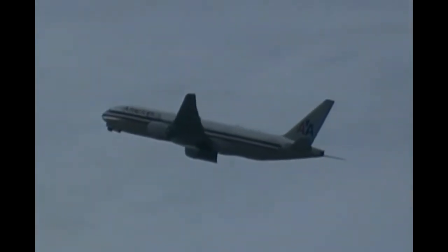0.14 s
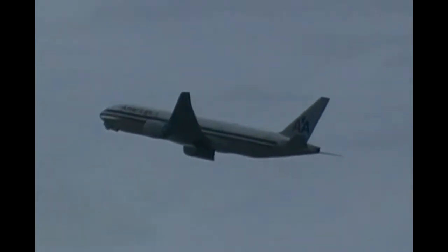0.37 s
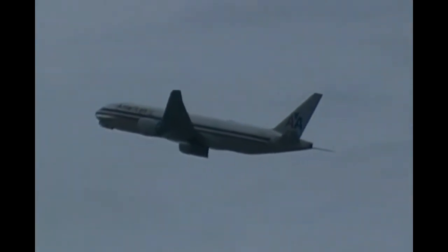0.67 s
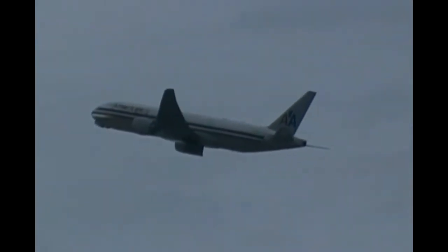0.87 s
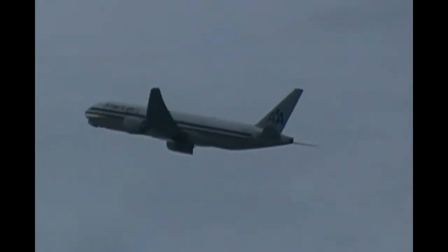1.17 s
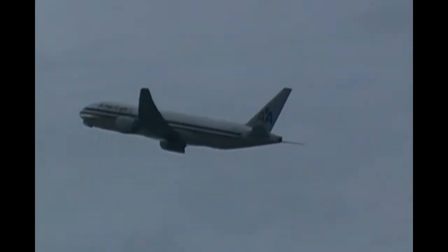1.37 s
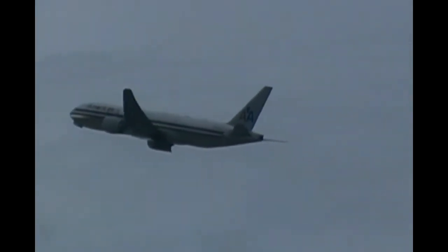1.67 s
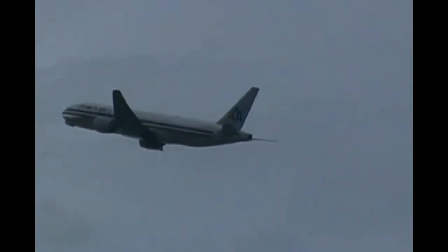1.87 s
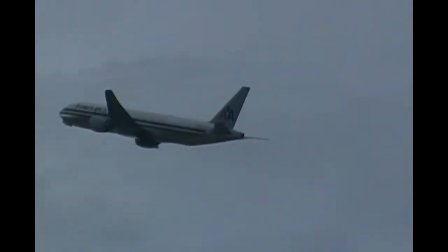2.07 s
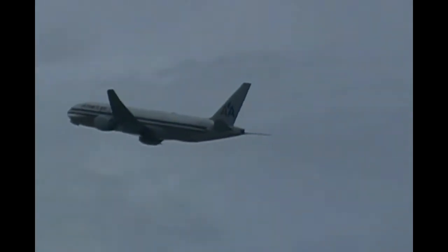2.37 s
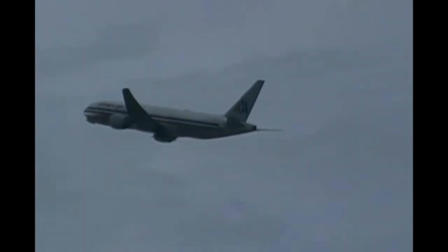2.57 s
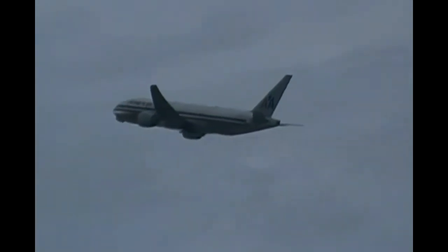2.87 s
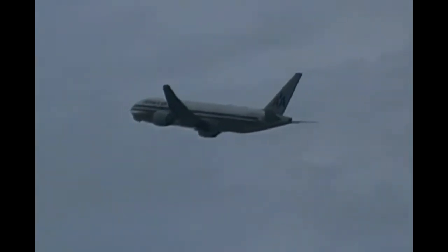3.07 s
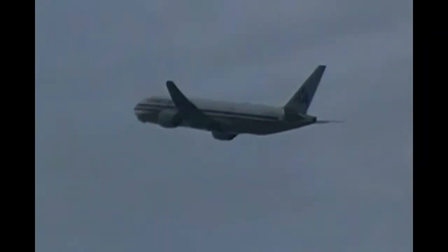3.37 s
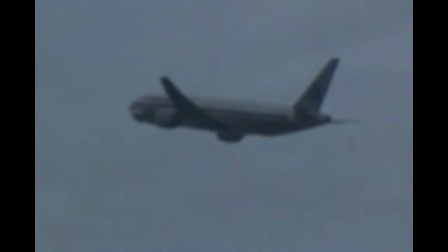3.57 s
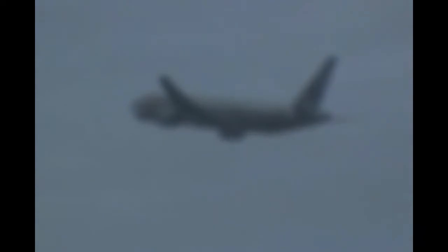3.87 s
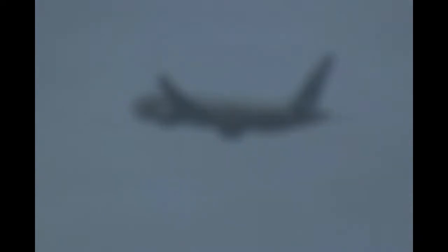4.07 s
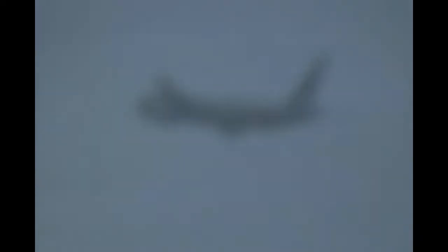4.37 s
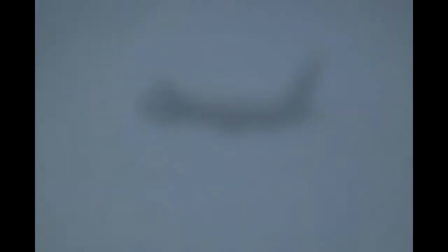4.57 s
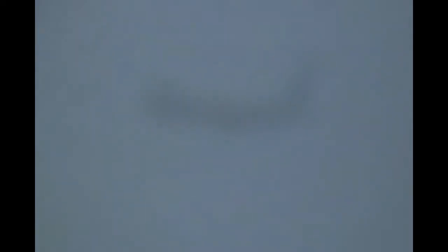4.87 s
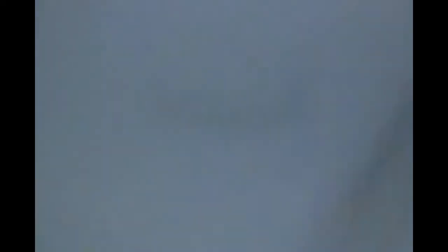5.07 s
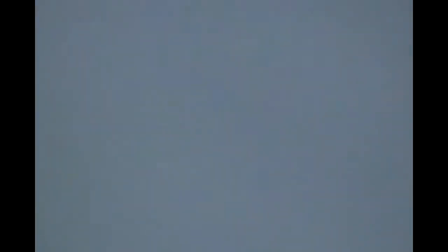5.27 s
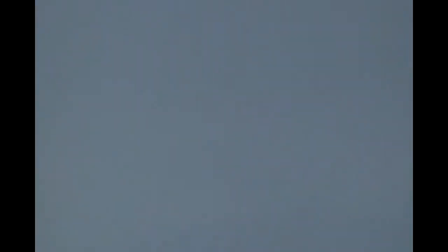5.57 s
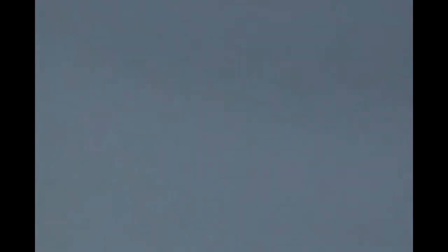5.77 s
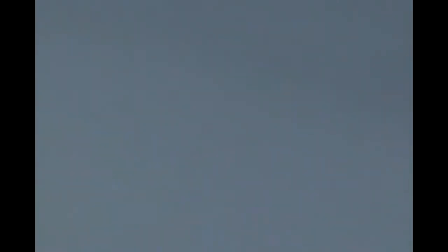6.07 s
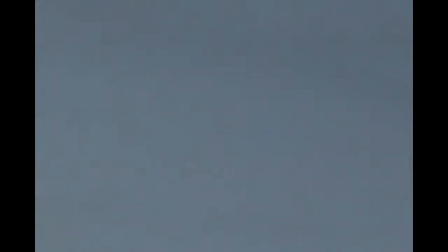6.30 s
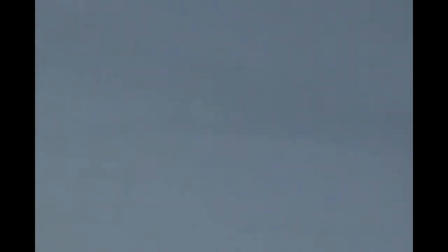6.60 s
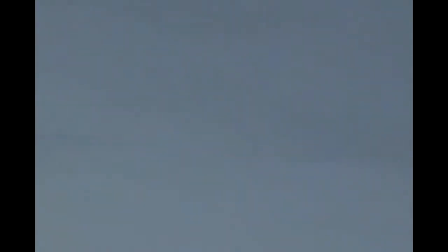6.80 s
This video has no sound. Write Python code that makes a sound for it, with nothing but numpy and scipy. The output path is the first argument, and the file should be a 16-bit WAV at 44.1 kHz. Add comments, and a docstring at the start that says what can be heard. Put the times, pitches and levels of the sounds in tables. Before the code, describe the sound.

A twin-engined airliner climbs away with a rumbling, crackling roar that sinks and returns brighter, while wind gusts buffet the microphone.

```python
"""A twin-engined airliner climbs away from a hand-held camera, its turbulent exhaust rumbling and
crackling under blurred fan tones. Gusts buffet the microphone, the case is scuffed and ticks, and the
level dips now and then. Near 3 s the roar sinks and the lens motor chirrs. From 4.5 s the aircraft has
turned and the roar returns brighter, with a wavering whine near 1 kHz; a small bird calls far off,
and after the sharpest tick the motor chirrs again."""
import sys
import numpy as np
from scipy import signal
from scipy.fft import rfft, irfft, next_fast_len
from scipy.io import wavfile
from scipy.ndimage import map_coordinates

SR = 44100
rng = np.random.default_rng(int(sys.argv[2]) if len(sys.argv) > 2 else 0)


def put_to_file(sound):
    """Save the sound as 16-bit audio at rate SR, in the file named by the first command-line argument."""
    columns = np.atleast_2d(sound).T  # one column per channel
    safe = np.clip(columns, -1, 1)
    whole_steps = np.round(safe * 32767)
    wavfile.write(sys.argv[1], SR, whole_steps.astype(np.int16))


N = 306054


def amp(db):
    """Amplitude ratio of a level in decibels."""
    return 10 ** (np.asarray(db) / 20)


def unit(x):
    """Normalisation to rms 1."""
    return x / np.sqrt(np.mean(x ** 2) + 1e-20)


def along(points, hz):
    """Interpolation of (frequency [Hz], value) points on a logarithmic axis."""
    f, v = np.transpose(points)
    return np.interp(np.log(hz + 1), np.log(f + 1), v)


def clock():
    """The time of every sample [s]."""
    return np.arange(N) / SR


def curves(rows):
    """Linear interpolation in time: one curve for each column after the first."""
    times, *columns = np.transpose(rows)
    return [np.interp(clock(), times, column) for column in columns]


def wobble(rate):
    """Smooth random modulation with `rate` knots a second."""
    return map_coordinates(rng.standard_normal(int(N * rate / SR) + 4), [clock() * rate])


def filtered(x, response):
    """Linear filtering: the spectrum of x times a frequency response."""
    size = next_fast_len(N + SR // 4)
    return irfft(rfft(x, size) * response(np.fft.rfftfreq(size, 1 / SR)), size)[..., :N]


def tone(hz):
    """A sinusoid of rms 1 whose phase is the integral of its frequency."""
    return np.sqrt(2) * np.sin(2 * np.pi * (np.cumsum(hz) / SR + rng.random()))


def rush(spectrum, coherence, shocks_per_s=0, shock_share=0):
    """Partly coherent stereo noise of rms 1; one-sided shocks carry a share of the mid power."""
    def mid_side(hz):
        angle = np.arccos(np.clip(along(coherence, hz), -1, 1)) / 2
        return amp(along(spectrum, hz)) * [np.cos(angle), np.sin(angle)]

    pair = rng.standard_normal((2, N))
    shocks = (rng.random(N) < shocks_per_s / SR) * rng.rayleigh(size=N)
    pair[0] = np.sqrt(1 - shock_share) * pair[0] + np.sqrt(shock_share) * unit(shocks)
    mid, side = filtered(pair, mid_side)
    return unit(np.array([mid + side, mid - side]))


# Strength of the exhaust: (time [s], rumble level [dB], rasp level [dB], hiss level [dB])
ROAR_LEVELS = [(0, -22.5, -32, -46), (.15, -24, -27.5, -49.5), (.23, -22.5, -28, -48.5),
               (.3, -21, -24.5, -45.5), (.38, -22.5, -29.5, -49), (.58, -27.5, -32, -52.5),
               (.72, -28, -32.5, -50.5), (.82, -23.5, -29.5, -50.5), (.95, -25, -31.5, -55),
               (1.09, -21.5, -28, -51.5), (1.2, -22.5, -31.5, -53), (1.33, -20, -31, -53),
               (1.4, -21.5, -32, -54.5), (1.48, -19.5, -28, -57), (1.6, -24, -27.5, -50.5),
               (1.71, -20.5, -25, -53), (1.81, -24.5, -30.5, -54.5), (1.96, -22, -28, -48.5),
               (2.1, -27.5, -33, -56), (2.3, -21.5, -30.5, -54), (2.45, -23.5, -30, -51.5),
               (2.67, -17.5, -26.5, -53.5), (2.76, -22.5, -31.5, -57.5), (2.82, -21, -27.5, -54),
               (2.87, -24, -31.5, -54), (2.95, -27, -37, -57.5), (3.28, -31.5, -38.5, -55.5),
               (3.56, -32.5, -37.5, -60.5), (3.73, -30, -35.5, -59.5), (4.02, -34, -41.5, -60),
               (4.17, -30, -36, -56), (4.23, -38, -38.5, -55), (4.29, -34.5, -33.5, -53.5),
               (4.36, -38, -39.5, -56), (4.52, -37, -36.5, -51.5), (4.63, -33.5, -31.5, -47.5),
               (4.77, -32, -29, -46), (5.0, -27.5, -26.5, -45.5), (5.25, -23, -23, -41.5),
               (5.48, -26.5, -24.5, -42), (5.66, -21.5, -21, -39), (5.86, -27, -26.5, -45.5),
               (6.0, -28, -24, -45.5), (6.3, -24, -22, -43.5), (6.47, -22.5, -22, -40.5),
               (6.56, -23.5, -21, -42.5), (6.64, -25, -22, -43), (6.72, -23.5, -20.5, -44),
               (6.82, -22.5, -21.5, -44.5), (6.94, -23.5, -24, -51)]
# Timbre as the aircraft turns away: (time [s], bright share of the power [0-1])
BRIGHT_SHARE = [(0, 0), (2.9, 0.06), (3.4, 0.15), (4.3, 0.2), (4.8, 1)]
# Spectra of the exhaust's layers: (frequency [Hz], relative level [dB])
RUMBLE_DARK = [(15, -65.5), (25, -26.5), (43, -21), (105, -10.5), (135, -5.5), (155, -7), (180, -3),
               (240, -2), (285, 0.5), (384, -6.5), (420, -3), (495, -3), (606, -13.5), (679, -9),
               (750, -18.5), (980, -42), (1650, -120)]
RUMBLE_BRIGHT = [(15, -56), (25, -19.5), (128, -4.5), (157, -5), (214, -0.5), (251, -1.5), (343, 0.5),
                 (449, -6), (623, -1.5), (750, -9), (980, -17.5), (1650, -120)]
RASP_DARK = [(440, -40.5), (750, -2), (1080, -6), (1210, -5), (2020, -6.5), (2400, -10), (2700, -17.5),
             (3100, -15.5), (3570, -16.5), (3720, -19), (4730, -42.5), (8010, -120)]
RASP_BRIGHT = [(440, -32), (750, -2.5), (902, -9), (997, -1.5), (1360, -7), (1970, -7.5), (2310, -13.5),
               (2530, -13), (3110, -20.5), (3640, -22), (4730, -70.5), (8010, -120)]
HISS_SPECTRUM = [(3000, -31), (3900, -2.5), (5100, -8), (6000, -12), (8000, -19), (9500, -27),
                 (11000, -37.5), (12500, -110)]
# Left-right likeness of each timbre: (frequency [Hz], coherence [0-1])
COHERENCE_DARK = [(1500, 0.99), (3200, .96), (7000, .55)]
COHERENCE_BRIGHT = [(60, 1), (190, 1), (400, 1), (1000, 1), (1800, 0.95), (3200, 0.83), (7000, 0.2)]

def exhaust():
    """Jet mixing noise: large eddies rumble, small ones rasp and hiss; moving air modulates them all."""
    rumble_db, rasp_db, hiss_db = curves(ROAR_LEVELS)
    bright, = curves(BRIGHT_SHARE)
    blend = lambda dark, light: np.sqrt(1 - bright) * dark + np.sqrt(bright) * light
    flutter_db = wobble(42) * (1 - 0.44 * bright)  # calmer in the bright timbre
    rumble = blend(rush(RUMBLE_DARK, COHERENCE_DARK, shocks_per_s=190, shock_share=0.18),
                   rush(RUMBLE_BRIGHT, COHERENCE_BRIGHT))
    rasp = blend(rush(RASP_DARK, COHERENCE_DARK, shocks_per_s=400, shock_share=0.21),
                 rush(RASP_BRIGHT, COHERENCE_BRIGHT))
    hiss = rush(HISS_SPECTRUM, COHERENCE_BRIGHT, shocks_per_s=38, shock_share=0.05)
    roar = (rumble * amp(rumble_db + flutter_db)
            + rasp * amp(rasp_db + flutter_db)
            + hiss * amp(hiss_db + 1.2 * flutter_db))
    swell_db = 0.72 * wobble(16)
    return roar * amp(swell_db)


# Tones of the fan: (frequency [Hz], bandwidth [Hz], level re the rasp [dB])
FAN_BANDS = [(2380, 75, -19.5), (3560, 60, -22.5)]

def fan(end_s=3.5, release_s=.7):
    """Spectral broadening: turbulent air smears the fan's tones, heard until the aircraft turns away."""
    _, rasp_db, _ = curves(ROAR_LEVELS)
    facing = np.clip((end_s - clock()) / release_s, 0, 1)
    bands = np.zeros(N)
    for hz, width_hz, db in FAN_BANDS:
        fading = amp(db + 2 * wobble(6))
        bands += fading * wobble(width_hz) * tone(hz + 20 * wobble(30))
    return facing * amp(rasp_db) * bands


# Gusts on the microphone: (time [s], level [dB], half length [s])
GUSTS = [(0.047, -26, 0.066), (0.157, -24, .035), (0.287, -29, 0.034), (0.501, -25, .045),
         (0.638, -23, 0.074), (0.814, -23.5, .035), (.923, -19, .002), (.93, -24, 0.082), (1.095, -25, .04),
         (1.22, -26.5, 0.057), (1.358, -24.5, .07), (1.566, -26, 0.062), (1.71, -27, 0.044),
         (1.96, -22, 0.063), (2.109, -26, 0.056), (2.248, -21.5, 0.037), (2.73, -23.5, .04),
         (2.829, -25.5, 0.046), (2.925, -25.5, 0.066), (3.054, -25, 0.058), (3.138, -23, .004),
         (3.187, -24.5, 0.017), (3.249, -25, 0.043), (3.353, -21, .008), (3.427, -23, .025),
         (3.518, -26, .04), (3.63, -27, .05), (3.724, -24, 0.06), (3.829, -20.5, .003),
         (3.872, -24.5, 0.043), (3.903, -15, 0.002), (3.99, -31.5, 0.054), (4.175, -31, 0.022),
         (4.36, -36.5, 0.069), (4.753, -39, 0.047), (5.891, -20, .013), (6.048, -21, 0.023),
         (6.13, -24.5, .03), (6.722, -35, .04), (6.916, -32, 0.031)]
# Spectra of the gusts and of the steady breeze: (frequency [Hz], relative level [dB])
GUST_SPECTRUM = [(20, -32), (45, -16.5), (86, -11), (130, -3), (180, 0), (290, 0.5), (480, -2), (600, -5),
                 (800, -11), (1000, -14.5), (2000, -25.5), (3000, -36), (6000, -57), (12000, -120)]
BREEZE_SPECTRUM = [(20, -26), (45, -5), (90, 3.5), (160, 2.5), (400, -17.5), (1200, -60.5), (5000, -120)]

def wind(buffet_db=2.5, buffets_per_s=70, breeze_db=-44.5):
    """Turbulent pressure is local: over a light breeze, gusts buffet each microphone port separately."""
    power = sum(amp(db) ** 2 * np.exp(-((clock() - s) / half_s) ** 2) for s, db, half_s in GUSTS)
    buffets = amp(buffet_db * np.array([wobble(buffets_per_s), wobble(buffets_per_s)]))
    gusts = np.sqrt(power) * unit(buffets * rush(GUST_SPECTRUM, coherence=[(60, 0)]))
    return gusts + amp(breeze_db) * rush(BREEZE_SPECTRUM, coherence=[(60, .1)])


def decay(start_s, t60):
    """Exponential decay from a sudden onset, 60 dB in t60 seconds."""
    return (clock() >= start_s) * amp(-60 * np.abs(clock() - start_s) / t60)


# Spectrum of a scuff on the case: (frequency [Hz], relative level [dB])
SCUFF_SPECTRUM = [(4300, -40), (5200, 0), (6300, -7), (7000, -3), (8000, -6), (8400, -17), (9300, -20),
                  (10000, -70)]

def scuff(start_s=.0767, level_db=-33):
    """Friction noise: a contact too light to ring the case gives a thin snap and a hissing tail."""
    snap = decay(start_s, t60=.03)
    tail = amp(-14) * decay(start_s, t60=.3)
    return amp(level_db) * (snap + tail) * rush(SCUFF_SPECTRUM, coherence=[(6000, 0.57)])


# Ticks of the camera case: (time [s], level [dB], left minus right [dB])
TICKS = [(.709, -29, 0), (2.9395, -32, 0), (2.973, -16.5, -13), (3.310, -36, -5), (4.335, -26.5, 0),
         (4.3725, -24.5, 0), (4.430, -25.5, 0), (4.5012, -23, 0), (4.5445, -17.5, 0), (5.2343, -1.2, 0),
         (5.2366, -8, 0), (5.379, -18, 0), (6.079, -16, 0)]
# Modes of the case: (frequency [Hz], level [dB], decay time T60 [s])
CASE_MODES = [(520, -8, .0061), (1450, -3.5, .005), (2550, 1.5, .0038), (3050, 2.5, .0038),
              (3600, -3, .0034), (4770, -10, .003), (6050, -6.5, .0018), (7500, -9, .0019),
              (10200, -17, .0015)]
# Weak radiation of the highest treble: (frequency [Hz], gain [dB])
CASE_ROLL_OFF = [(11500, -0.5), (13000, -46)]

def case_ticks(chatter_t60=0.011):
    """Modal ringing: a few milliseconds of chatter excite the damped modes of the plastic case."""
    ticks = np.zeros((2, N + SR))
    t = np.arange(SR // 20) / SR
    ring = sum((-1) ** k * amp(db - 60 * t / t60) * np.sin(2 * np.pi * hz * t)
               for k, (hz, db, t60) in enumerate(CASE_MODES))
    for s, db, pan_db in TICKS:
        noise = rng.standard_normal(len(t)) + 0.45 * rng.standard_normal((2, len(t)))
        chatter = noise * amp(-60 * t / chatter_t60)
        tick = signal.fftconvolve(chatter, ring[None], axes=1)[:, :len(t)]
        gains = amp(db + pan_db * np.array([[.5], [-.5]]))
        start = round(s * SR)
        ticks[:, start:start + len(t)] += gains * tick / np.abs(tick).max()
    return filtered(ticks[:, :N], lambda hz: amp(along(CASE_ROLL_OFF, hz)))


# Brief dips of the level: (time [s], depth [dB], hold [s])
DIPS = [(0.713, 4, 0.02), (1.116, 3, 0.027), (1.607, 4, 0.02), (1.979, 4, 0.026), (2.971, 10, 0.1),
        (5.293, 21, 0.0078), (5.866, 8.5, 0.067), (6.035, 10, 0.018), (6.145, 5.5, 0.024)]

def dips(fall_s=0.011, recovery_db_per_s=102):
    """Gain modulation: the level drops fast, holds and climbs back at a steady rate."""
    gain_db = np.zeros(N)
    for s, depth_db, hold_s in DIPS:
        times = np.cumsum([s, fall_s, hold_s, depth_db / recovery_db_per_s])
        gain_db += np.interp(clock(), times, [0, -depth_db, -depth_db, 0])
    return amp(gain_db)


# Runs of the lens motor: (time of peak [s], level [dB], rise time [s])
MOTOR_RUNS = [(2.974, -31, .011), (5.289, -25.5, .056)]
# Harmonics of its steps: (multiple of the step rate [1], relative level [dB])
STEP_HARMONICS = [(1, 2), (2, -3.5), (3, -8), (4, -9), (5, -10.5), (6, -9.5), (7, -11.5), (8, -10), (9, -8),
                  (10, -11), (11, -11)]
# Resonances of its gears: (frequency [Hz], relative level [dB])
GEAR_MODES = [(3900, -7), (5080, -2), (6520, -1), (7920, 0), (9400, -4), (10500, -2), (11800, -4)]

def lens_motor(step_hz=1021, run_s=.018, stop_s=.009, ramp_db=23, sag_db=11):
    """Quasi-periodic forcing: a small motor's uneven steps buzz while its gears rattle and scrape."""
    envelope = np.zeros(N)
    for s, db, rise_s in MOTOR_RUNS:
        t = clock() - s
        ramps = np.maximum(-t / rise_s, 0) + np.maximum((t - run_s) / stop_s, 0)
        envelope += amp(db - ramp_db * ramps - sag_db * np.clip(t / run_s, 0, 1))
    rate_hz = step_hz * (1 + .007 * wobble(300))
    phase = 2 * np.pi * np.cumsum(rate_hz) / SR
    unevenness = amp(4.5 * wobble(400))
    steps = unevenness * sum(amp(db) * np.cos(k * phase) for k, db in STEP_HARMONICS)
    # Each gear resonance is a wavering band about 250 Hz wide.
    gears = sum(amp(db) * wobble(250) * tone(hz + 60 * wobble(300)) for hz, db in GEAR_MODES)
    scrape = rush(spectrum=[(200, -45), (900, 11), (4000, -13), (11500, -19), (13000, -80)],
                  coherence=[(1000, 0.55)])
    chirr = unit(steps) + amp(-7) * unit(gears) + amp(-9) * scrape
    return envelope * chirr * amp([[-3.5], [2.5]])  # nearer the right port


def pin_tick(start_s=3.3095, level_db=-38):
    """A brief contact has a broad spectrum: one faint, pin-sharp tick on the right."""
    burst = decay(start_s, t60=.009) * rng.standard_normal(N)
    return amp(level_db) * burst * amp([[-6], [2]])


# Whine as the engines turn their backs: (time [s], pitch [Hz], level re the rasp [dB])
WHINE_COURSE = [(4.52, 1007, -26), (4.68, 1005, -5.5), (4.8, 1000, -12), (4.89, 1000, -4), (5.2, 1001, -8),
                (5.3, 998, -15), (5.5, 995, -6), (5.66, 992, -10), (5.85, 991, -4), (5.93, 990, -22),
                (6.18, 995, -18), (6.34, 992, -12), (6.56, 987, -10), (6.72, 990, -19), (6.85, 990, -8),
                (6.94, 962, -6)]
# Its partials: (multiple of the pitch [1], level [dB])
WHINE_PARTIALS = [(.645, -18), (1, -0.5), (.82, -14.5), (1.09, -15.5), (1.13, -8.5), (1.495, -14),
                  (2, -14.5), (2.14, -19)]

def whine(waver_share=.0055, scatter_db=-7):
    """Multipath interference: each slowly sinking engine tone mixes with a scattered, broken copy."""
    pitch_hz, level_db = curves(WHINE_COURSE)
    _, rasp_db, _ = curves(ROAR_LEVELS)
    direct = lambda hz: tone(hz * (1 + waver_share * wobble(70)))
    scattered = lambda hz: amp(scatter_db) * wobble(45) * tone(hz)
    tones = sum(amp(db) * (direct(k * pitch_hz) + scattered(k * pitch_hz)) for k, db in WHINE_PARTIALS)
    begun = clock() > WHINE_COURSE[0][0]
    return begun * amp(rasp_db + level_db) * tones


# Bird calls: (time [s], level [dB])
BIRD_CALLS = [(4.577, -42.5), (5.625, -38), (6.479, -41)]
# Notes of a call: (delay [s], rise [s], fall [s], first pitch [Hz], top pitch [Hz], last pitch [Hz])
CALL_NOTES = [(0, .009, .024, 4700, 5450, 3800), (.054, .026, .014, 3200, 4550, 3200)]

def bird(roughness_hz=170, echo_db=1.5, echo_t60=.45):
    """Frequency modulation: two arched notes a call, trailed by reflections off ground and buildings."""
    song = np.zeros(N)
    for s, db in BIRD_CALLS:
        for delay, rise, fall, *pitches_hz in CALL_NOTES:
            times = np.cumsum([s + delay, rise, fall])
            arch = np.interp(clock(), times, [0, 1, 0])
            pitch_hz = np.interp(clock(), times, pitches_hz) + roughness_hz * wobble(700)
            song += amp(db) * np.sqrt(arch) * tone(pitch_hz)
    t = np.arange(SR // 2) / SR
    tail = rng.standard_normal((2, len(t))) * amp(-60 * t / echo_t60)
    echoes = signal.fftconvolve(song[None], tail / np.linalg.norm(tail[0]), axes=1)[:, :N]
    return song + amp(echo_db) * echoes


def scene():
    """Superposition: the sources add, and all but the lens motor dip in level together."""
    sources = exhaust() + fan() + wind() + scuff() + case_ticks() + pin_tick() + whine() + bird()
    return dips() * sources + lens_motor()


# Balance of the microphone pair: (frequency [Hz], left minus right [dB])
PORT_BALANCE = [(60, -4), (150, -1.5), (400, -2.5), (1200, -0.5), (3000, -0.5), (8000, -2)]

def record(dry, lag_s=4.2e-5, top_hz=16000):
    """Time and level cues: the left port hears a little later and weaker; both are band-limited."""
    sides = np.array([[.5], [-.5]])
    balance = lambda hz: amp(sides * along(PORT_BALANCE, hz))
    delay = lambda hz: np.exp(-2j * np.pi * hz * lag_s * sides)
    return filtered(dry, lambda hz: balance(hz) * delay(hz) * (hz < top_hz))


dry = scene()
out = record(dry)
put_to_file(out)
```